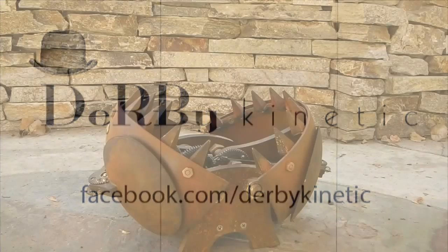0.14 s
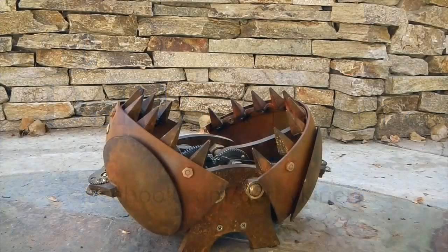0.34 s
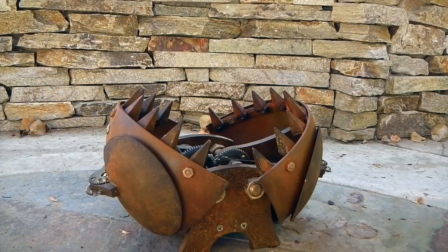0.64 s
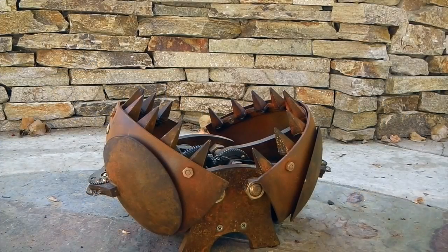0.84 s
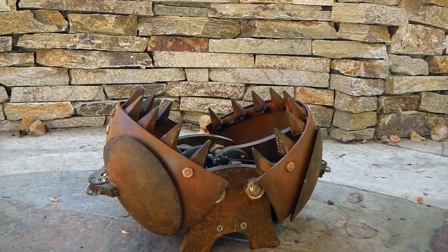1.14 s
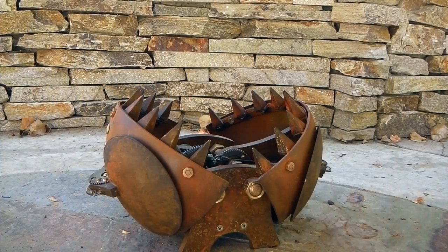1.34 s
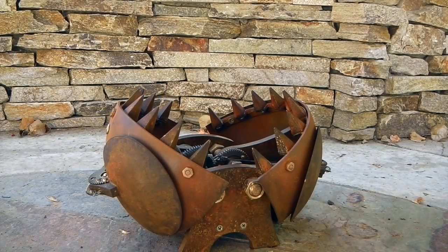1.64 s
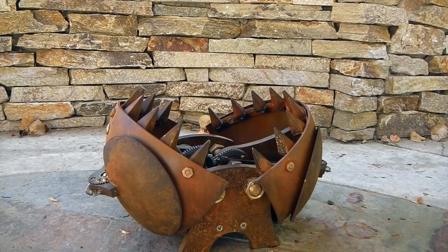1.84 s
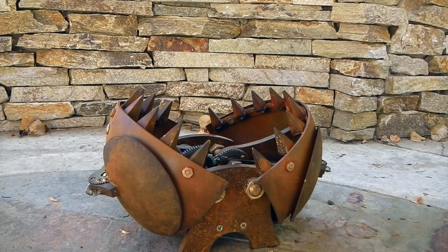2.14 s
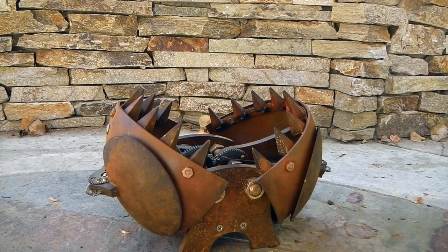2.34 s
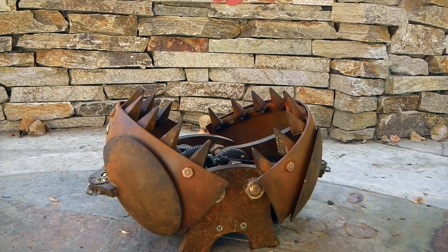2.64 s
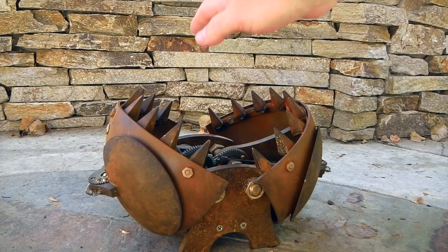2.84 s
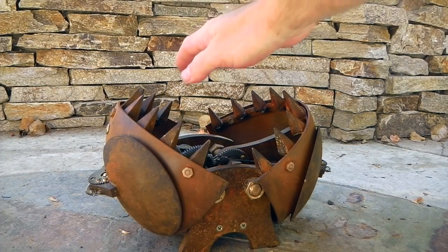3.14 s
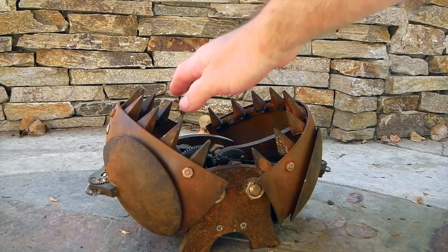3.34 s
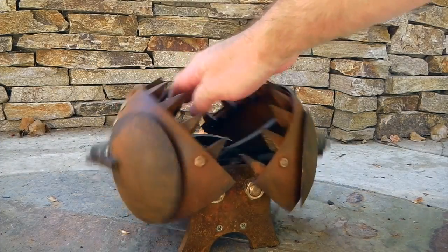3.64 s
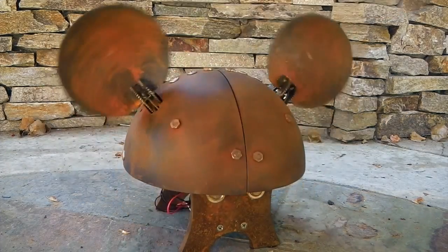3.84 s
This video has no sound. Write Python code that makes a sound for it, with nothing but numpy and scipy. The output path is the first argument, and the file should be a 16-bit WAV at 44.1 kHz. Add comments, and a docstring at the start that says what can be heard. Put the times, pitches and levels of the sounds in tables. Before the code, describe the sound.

Steel jaws of a mechanical sculpture rasp and slam shut after a quiet outdoor wait.

```python
"""Sprung steel jaws on a patio

A steel sculpture waits over a low outdoor rumble and a few faint scuffs and ticks.
Tripped, its gears run with a rising rasp, sliding steel squeals, links chink and loose plates ping.
The jaws slam and rattle, ringing shells and frame; a stone wall answers.
The sound fades in and clips on the slam."""
import sys
import numpy as np
from scipy import signal
from scipy.fft import rfft, irfft, next_fast_len
from scipy.io import wavfile
from scipy.ndimage import map_coordinates

SR = 44100
rng = np.random.default_rng(int(sys.argv[2]) if len(sys.argv) > 2 else 0)


def wav_out(sig):
    """Save sig, one row per channel (or a flat mono array), as 16-bit PCM at SR to the path in sys.argv[1]."""
    wavfile.write(sys.argv[1], SR, np.round(np.clip(np.atleast_2d(sig).T, -1, 1) * 32767).astype(np.int16))


N = 176400

# background and stirring noise spectra (frequency [Hz], level [dB])
RUMBLE_SPECTRUM = [(13, -63), (22, -28), (27, -30), (40, -19.5), (55, -3.5), (113, 0.5), (129, -0.5),
                   (161, -9.5), (182, -6), (232, -10), (318, -16), (346, -26), (400, -21.5), (520, -46),
                   (880, -120)]
AIR_SPECTRUM = [(180, -21), (300, -3), (404, -9), (454, -1), (582, -7.5), (643, -4.5), (1020, -3),
                (1110, -6), (1600, -9.5), (2270, -16), (8700, -27.5), (11300, -29), (15800, -42)]
SCUFF_SPECTRUM = [(1000, 0), (3000, 1), (3900, 2), (4600, -4), (8000, -1.5), (12000, -9), (15500, -19)]
SHUFFLE_SPECTRUM = [(200, -2), (440, 4), (680, 5), (950, -4), (1400, -42)]
# faint scuffs (peak time [s], level [dB], rise [s], fall [s])
SCUFF_EVENTS = [(.89, -45.5, 0.025, 0.047), (1.01, -45.5, 0.031, 0.035), (1.265, -44, 0.052, 0.036),
                (2.6, -43, 0.015, 0.019), (2.675, -48, 0.032, .022), (2.76, -51, 0.069, 0.082)]
# small ticks (time [s], level [dB], centre [Hz])
TICK_EVENTS = [(1.154, -36, 3260), (1.592, -41, 5500), (1.611, -42, 5500), (1.613, -37, 2700),
               (1.632, -36, 2300), (1.649, -42, 5500), (1.668, -42, 2780), (1.682, -46, 5500),
               (1.7013, -48, 2900), (1.733, -45, 5500), (1.755, -34, 620), (2.615, -34, 2980),
               (3.116, -39, 3000), (3.121, -26, 650)]
# plate taps (time [s], level [dB], pitch [Hz], t60 [s])
PING_EVENTS = [(3.6015, -18.5, 2110, 0.058), (3.733, -14, 3395, 0.081), (3.812, -24, 2100, 0.045),
               (3.822, -15, 2143, 0.03), (3.9028, -6, 3300, 0.012), (3.9105, -12.5, 2050, 0.067),
               (3.993, -18.5, 2080, 0.033)]
# link and tooth contacts (time [s], level [dB], t60 [s])
CHINK_EVENTS = [(3.359, -36.5, 0.046), (3.553, -23.5, 0.065), (3.571, -30, 0.053), (3.708, -13, 0.12),
                (3.7465, -12, 0.048), (3.764, -18.5, 0.053), (3.7778, -15, 0.022), (3.8005, -24, 0.058),
                (3.829, -5.5, 0.048), (3.835, -24, 0.051), (3.857, -19.5, 0.18), (3.88, -19.5, 0.077)]
# steel sliding on steel (peak time [s], half length [s], pitch [Hz], level [dB])
SQUEAL_EVENTS = [(3.445, .02, 2740, -26), (3.45, .02, 2010, -30), (3.465, .03, 4830, -33),
                 (3.49, .014, 2090, -24), (3.497, .016, 2800, -21), (3.5, .015, 1350, -32),
                 (3.52, .018, 2270, -24), (3.53, .018, 5030, -30), (3.535, .022, 3430, -26),
                 (3.555, .02, 1680, -25), (3.64, .035, 1400, -32), (3.705, .017, 2010, -21),
                 (3.705, .013, 3240, -21), (3.715, .01, 4950, -25), (3.74, .012, 2260, -23)]
# gear envelopes (time [s], rasp [dB], fizz [dB], grind [dB])
GEAR_LEVELS = [(3.355, -84, -55, -70), (3.38, -40, -44.5, -63), (3.42, -23, -34, -63),
               (3.47, -23, -28.5, -41), (3.495, -21, -29, -41), (3.555, -21.5, -27.5, -39),
               (3.594, -23.5, -37.5, -29), (3.615, -27, -34, -38), (3.68, -25, -30, -35),
               (3.70, -23, -24.5, -36), (3.742, -17.5, -36, -21.5), (3.76, -31, -25, -39),
               (3.789, -21, -28, -17.5), (3.82, -31.5, -36, -56), (3.889, -13.5, -32.5, -32),
               (3.93, -29.5, -33.5, -35), (4.0, -26.5, -34.5, -33.5)]
# blows on the shells (time [s], ring [dB], thud [dB], contact t60 [s])
BLOW_EVENTS = [(3.583, -20, -27.5, 0.06), (3.593, -23.5, -25.5, 0.053), (3.731, -21, -22.5, .05),
               (3.7692, -11.5, -14.5, 0.057), (3.784, -15.5, -25, 0.031), (3.846, -13, -15.5, 0.027),
               (3.8503, 0, -11.5, 0.044), (3.8535, 2, 1.5, 0.042), (3.8625, -12, -36, 0.04),
               (3.877, -15, -26, 0.087), (3.8915, -21, -28, .05), (3.9105, -18, -18, 0.024)]
# contact noise spectra of links, gears and jaws (frequency [Hz], level [dB])
CHINK_SPECTRUM = [(2000, -35), (3500, -4.5), (4500, -2.5), (8500, 2), (12000, -4.5), (15500, -14)]
RASP_SPECTRUM = [(700, -35), (1300, -6.5), (2100, 1), (2800, 1.5), (3600, 0), (4200, -8), (6000, -40),
                 (12000, -60)]
FIZZ_SPECTRUM = [(2500, -26), (4500, 3.5), (5200, 3), (6500, 1), (9000, 2.5), (10000, -6), (11700, 0),
                 (13500, -8.5), (15800, -10)]
GRIND_SPECTRUM = [(200, -36), (400, -9), (650, -4), (900, -4.5), (1300, 0.5), (2000, -6), (5000, -62)]
CRASH_SPECTRUM = [(900, -43), (1600, -5), (2300, 13.5), (3200, 0.5), (3900, 3), (4500, -12), (8000, -17),
                  (15000, -39)]
THUD_SPECTRUM = [(40, -18), (120, 0), (300, 1), (430, 4.5), (700, 3), (1200, -11.5), (1600, 0.5),
                 (2500, -12), (6000, -60)]
# resonances of the steel parts (frequency [Hz], bandwidth [Hz], level [dB])
LINK_MODES = [(4500, 220, -2), (5190, 48, 8.5), (6380, 110, 5.5), (7200, 220, -2), (8270, 130, 2),
              (9800, 160, 2), (11240, 130, 3), (12640, 110, 1)]
WHEEL_MODES = [(4800, 36, -1), (5230, 46, -8.5), (5670, 71, -6), (5950, 34, -5.5), (6130, 80, -4.5),
               (6820, 170, -9), (7290, 48, -5), (8400, 77, -7), (9100, 50, -4.5), (10600, 67, -6.5),
               (11000, 32, -21), (12000, 44, -17)]
SHELL_MODES = [(1880, 32, -5), (2020, 30, -5), (2172, 32, 0), (2312, 30, -1), (2605, 30, 2), (2780, 40, -9),
               (3020, 32, -1), (3190, 35, -7), (3290, 35, -6), (3428, 35, -2), (3540, 32, -4),
               (3820, 55, -4), (3980, 40, -8)]
FRAME_MODES = [(553, 18, -6), (840, 40, -7), (1022, 26, -5), (1150, 50, -8), (1320, 35, -9),
               (1410, 30, -12)]
# stereo width (frequency [Hz], side gain [dB])
PATIO_WIDTH = [(60, -31), (120, -24), (240, -25.5), (480, -16.5), (950, -40.5), (1890, -27.5), (3770, -7.5),
               (7520, -3), (15000, 1.5)]
MACHINE_WIDTH = [(60, -19), (120, -23), (240, -20), (480, -13.5), (950, -31), (1890, -18), (3770, -32.5),
                 (7520, -16.5), (15000, -3)]

RUMBLE_DB, AIR_DB, AIR_SWAY_DB = -35.5, -43, -1.3
HUM_HZ, HUM_WIDTH_HZ, HUM_DB = 117.6, 7.5, -42.5
WALL_DB, WALL_T60_S, WALL_DELAY_S = -17.5, 0.25, 0.01
SHUFFLE_S, SHUFFLE_DB = 1.628, -39
TICK_T60_S, TICK_WIDTH_OCT = 0.025, 0.4
LINK_RING_DB, CHINK_NOISE_DB = -4.5, -2
SQUEAL_DB, SQUEAL_FLUTTER_DB, SQUEAL_OCT_PER_S, SQUEAL_JITTER = -1, 2.5, 1.3, 0.005
CONTACTS_PER_S, TOOTH_HZ, TOOTH_JITTER, TOOTH_DEPTH_DB = 12000, 85, 0.205, 2
RASP_RING_DB, RASP_NOISE_DB, WHEEL_DB, FIZZ_DB = -8.5, -5, -4.5, -3
BLOW_ATTACK_S, KICK_TO_CHATTER = 0.00038, 1.7
SHELL_DB, CRASH_DB, FRAME_DB, THUD_DB = -2, -3.5, -8.5, -8.5
CLANG_HZ, CLANG_DB, CLANG_T60_S = 699.5, -3, 0.094
THUMP_S, THUMP_HZ, THUMP_DB, THUMP_T60_S = 3.853, 210, -8.5, 0.022
FADE_S, CLIP_LEVEL, TOP_HZ = 0.33, 0.92, 15900
TIME_S = np.arange(N) / SR


def amp(db):
    """Decibels to gain."""
    return 10 ** (np.asarray(db) / 20)


def unit(x):
    """Scale to rms 1."""
    return x / np.sqrt(np.mean(x ** 2) + 1e-20)


def gain_at(spectrum, hz):
    """Gain from (Hz, dB) points on a log frequency axis."""
    points_hz, db = np.transpose(spectrum)
    return amp(np.interp(np.log(hz + 1), np.log(points_hz + 1), db))


def filtered(x, response):
    """Apply a frequency response."""
    size = next_fast_len(N + SR // 2)
    return irfft(rfft(x, size) * response(np.fft.rfftfreq(size, 1 / SR)), size)[..., :N]


def coloured(x, spectrum):
    """Shape x, rolling off below the first point; rms 1."""
    return unit(filtered(x, lambda f: gain_at(spectrum, f) * np.minimum(1, f / spectrum[0][0]) ** 2))


def noise(spectrum):
    """Coloured noise, rms 1."""
    return coloured(rng.standard_normal(N), spectrum)


def noise_band(detune):
    """Noise band, rms 1; detune(f) counts half widths from its centre."""
    return unit(filtered(rng.standard_normal(N), lambda f: 1 / (1 + detune(f) ** 4)))


def resonate(x, modes):
    """Parallel modes of alternating sign; white noise keeps its power."""
    def body(f):
        response = sum((-1) ** k * amp(db) * 1j * f * width / (hz * hz - f * f + 1j * f * width)
                       for k, (hz, width, db) in enumerate(modes))
        return unit(abs(response)) * np.exp(1j * np.angle(response))
    return filtered(x, body)


def wobble(rate_hz):
    """Smooth random curve."""
    knots = rng.standard_normal(int(N * rate_hz / SR) + 4)
    return map_coordinates(knots, [TIME_S * rate_hz])


def strike(start_s, t60_s, attack_s):
    """Contact envelope: fast rise, exponential decay."""
    age_s = np.maximum(TIME_S - start_s, 0)
    return (1 - np.exp(-age_s / attack_s)) * np.exp(-np.minimum(np.log(1000) * age_s / t60_s, 60))


def swell(peak_s, rise_s, fall_s):
    """Two-sided Gaussian envelope."""
    t = TIME_S - peak_s
    return np.exp(-np.minimum(0.5 * (t / np.where(t < 0, rise_s, fall_s)) ** 2, 60))


def contacts():
    """Dense tiny impacts of steel on steel."""
    return rng.standard_normal(N) * (rng.random(N) < CONTACTS_PER_S / SR)


def spread(mid, scatter, width, lean_db):
    """Mid/side stereo; the side is separate scatter, strongest in the treble."""
    side = filtered(scatter, lambda f: gain_at(width, f))
    return np.array([mid + side, mid - side]) * amp([[-lean_db], [lean_db]])


def outdoors():
    """Distant rumble, wavering hum and soft airy noise."""
    hum = amp(HUM_DB) * noise_band(lambda f: (f - HUM_HZ) / HUM_WIDTH_HZ)
    rumble = amp(RUMBLE_DB) * noise(RUMBLE_SPECTRUM)
    air = amp(AIR_DB + AIR_SWAY_DB * wobble(6.8)) * noise(AIR_SPECTRUM)
    return rumble + hum + air


def stirrings():
    """Faint scuffs, a dull shuffle and small ticks during the wait."""
    humps = sum(amp(db) * swell(s, rise_s, fall_s) for s, db, rise_s, fall_s in SCUFF_EVENTS)
    out = noise(SCUFF_SPECTRUM) * amp(1.8 * wobble(70)) * humps
    shuffle = noise(SHUFFLE_SPECTRUM) * amp(SHUFFLE_DB + wobble(50.7))
    out += shuffle * swell(SHUFFLE_S, rise_s=0.21, fall_s=0.082)
    for s, db, hz in TICK_EVENTS:
        band = noise_band(lambda f: np.log2((f + 1) / hz) / TICK_WIDTH_OCT)
        out += amp(db) * band * strike(s, TICK_T60_S, attack_s=0.0006)
    return out


def wall(x):
    """Short scattered reflection off the stone wall."""
    t = np.arange(SR // 2) / SR
    tail = rng.standard_normal(len(t)) * amp(-60 * t / WALL_T60_S) * (t > WALL_DELAY_S)
    return amp(WALL_DB) * signal.fftconvolve(x, tail / np.linalg.norm(tail))[:N]


def plates():
    """Loose plates tap, each ringing briefly on one note."""
    out = np.zeros(N)
    for s, db, hz, t60_s in PING_EVENTS:
        tone = np.sin(2 * np.pi * hz * (TIME_S - s) + 0.3 * wobble(500))
        out += amp(db) * strike(s, t60_s, attack_s=0.00041) * tone
    return out


def links():
    """Small steel parts collide and ring brightly."""
    force = sum(amp(db) * strike(s, t60_s, attack_s=0.00074) for s, db, t60_s in CHINK_EVENTS)
    ring = amp(LINK_RING_DB) * resonate(force * unit(contacts()), LINK_MODES)
    return ring + amp(CHINK_NOISE_DB) * force * noise(CHINK_SPECTRUM)


def squeals():
    """Sliding steel catches and sings in short rising notes."""
    out = np.zeros(N)
    for s, half_s, hz, db in SQUEAL_EVENTS:
        pitch_hz = hz * 2 ** (SQUEAL_OCT_PER_S * (TIME_S - s)) * (1 + SQUEAL_JITTER * wobble(250))
        envelope = amp(SQUEAL_DB + db + SQUEAL_FLUTTER_DB * wobble(200)) * swell(s, half_s, half_s)
        out += envelope * np.sin(2 * np.pi * np.cumsum(pitch_hz) / SR)
    return out


def gears():
    """Teeth rasp, fizz and grind, ringing the shells and wheels."""
    times_s, *levels_db = np.transpose(GEAR_LEVELS)
    rasp_gain, fizz_gain, grind_gain = [amp(np.interp(TIME_S, times_s, db, left=-120))
                                        for db in levels_db]
    tooth_hz = TOOTH_HZ * (1 + TOOTH_JITTER * wobble(28))
    teeth = amp(TOOTH_DEPTH_DB * np.sin(2 * np.pi * np.cumsum(tooth_hz) / SR))
    shells = amp(RASP_RING_DB) * unit(resonate(contacts(), SHELL_MODES))
    rasp = amp(RASP_NOISE_DB) * teeth * coloured(contacts(), RASP_SPECTRUM)
    wheels = amp(WHEEL_DB) * unit(resonate(teeth * contacts(), WHEEL_MODES))
    fizz = amp(FIZZ_DB) * teeth * coloured(contacts(), FIZZ_SPECTRUM)
    grind = coloured(contacts(), GRIND_SPECTRUM)
    return rasp_gain * (shells + rasp) + fizz_gain * (wheels + fizz) + grind_gain * grind


def clang():
    """The frame's dominant mode; blows add in power."""
    decays = [amp(CLANG_DB + thud_db) * strike(s, CLANG_T60_S, BLOW_ATTACK_S)
              for s, _, thud_db, _ in BLOW_EVENTS]
    return np.linalg.norm(decays, axis=0) * np.sin(2 * np.pi * CLANG_HZ * TIME_S + 0.38 * wobble(200))


def thump():
    """The slam thumps the base: one low damped tone."""
    envelope = amp(THUMP_DB) * strike(THUMP_S, THUMP_T60_S, BLOW_ATTACK_S)
    return envelope * np.sin(2 * np.pi * THUMP_HZ * (TIME_S - THUMP_S))


def jaws():
    """Each blow is a hard kick and a short chatter that ring shells and frame."""
    chatter, kicks = np.zeros((2, N)), np.zeros((2, N))  # rows: ring, thud
    for s, ring_db, thud_db, t60_s in BLOW_EVENTS:
        force = strike(s, t60_s, BLOW_ATTACK_S)
        gains = amp([ring_db, thud_db])
        chatter += gains[:, None] * force
        kicks[:, round(s * SR)] += gains * KICK_TO_CHATTER * np.linalg.norm(force)
    shell_drive, frame_drive = (kicks + chatter * unit(contacts())) / np.hypot(1, KICK_TO_CHATTER)
    shells = amp(SHELL_DB) * resonate(shell_drive, SHELL_MODES)
    frame = amp(FRAME_DB) * resonate(frame_drive, FRAME_MODES) + clang()
    crash = amp(CRASH_DB) * chatter[0] * noise(CRASH_SPECTRUM)
    thud = amp(THUD_DB) * chatter[1] * noise(THUD_SPECTRUM)
    return shells + frame + crash + thud + thump()


def scene():
    """Sculpture and wall reflection over the quiet patio, in stereo."""
    machine = gears() + squeals() + jaws() + links() + plates()
    sculpture = spread(machine + wall(machine), gears() + jaws() + links(), MACHINE_WIDTH, lean_db=0.28)
    patio = spread(stirrings() + outdoors(), outdoors(), PATIO_WIDTH, lean_db=0.35)
    return sculpture + patio


def record(dry):
    """Fade in, overload on the slam, band limit."""
    faded = dry * np.minimum(TIME_S / FADE_S, 1)
    return filtered(np.clip(faded, -CLIP_LEVEL, CLIP_LEVEL), lambda f: f < TOP_HZ)


dry = scene()
out = record(dry)
wav_out(out)
```